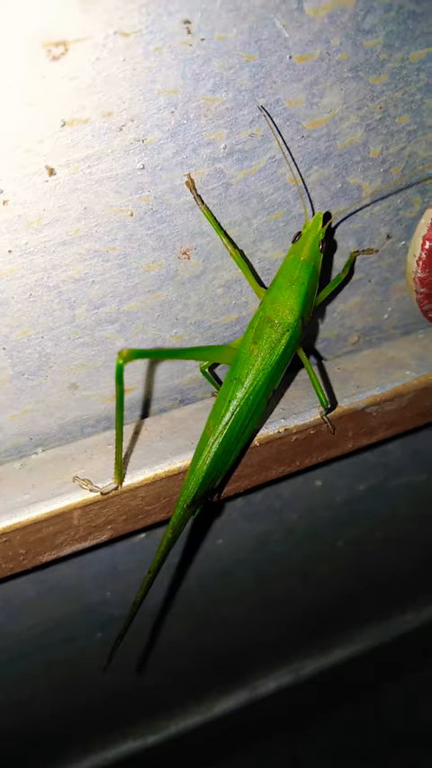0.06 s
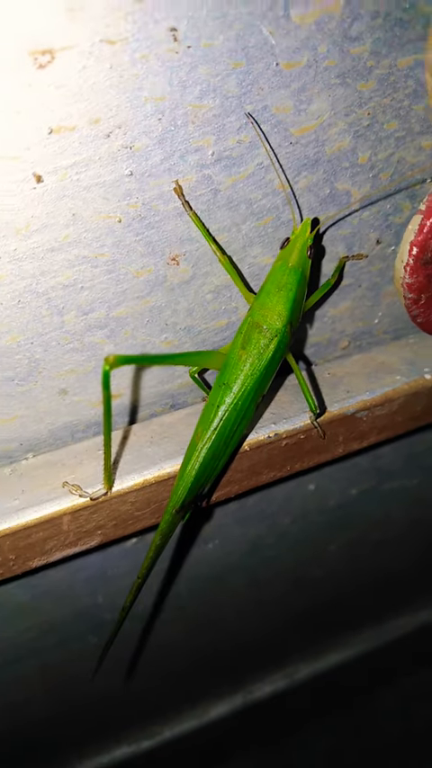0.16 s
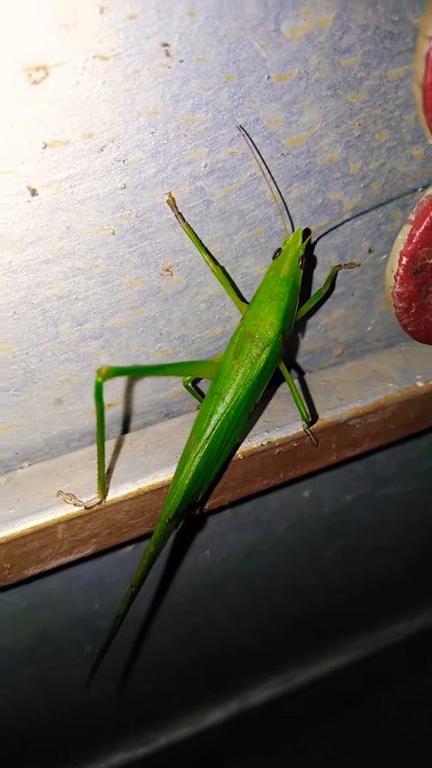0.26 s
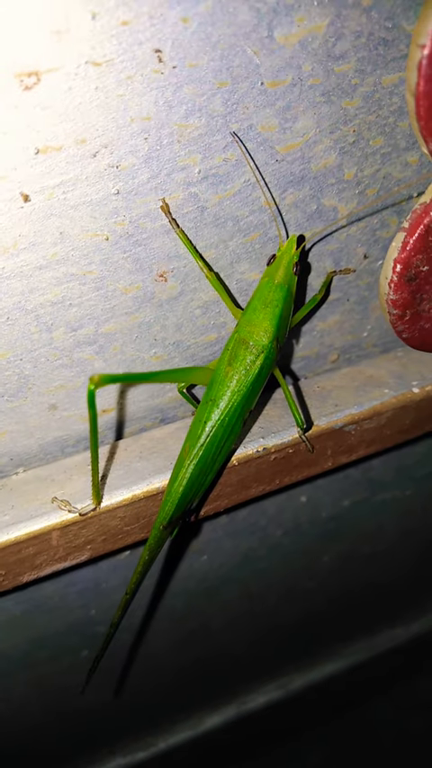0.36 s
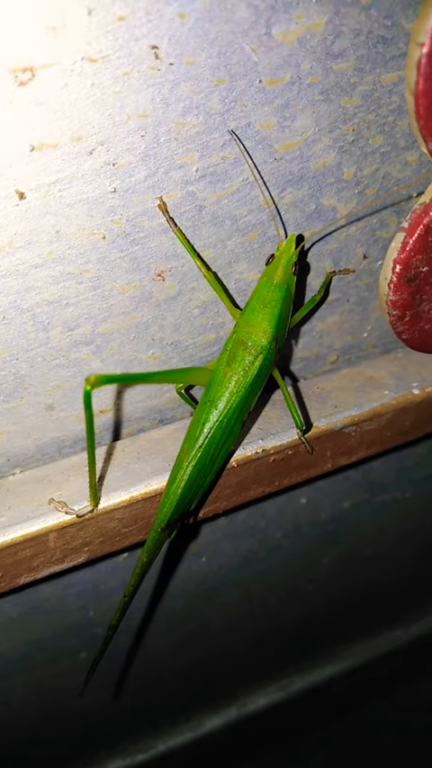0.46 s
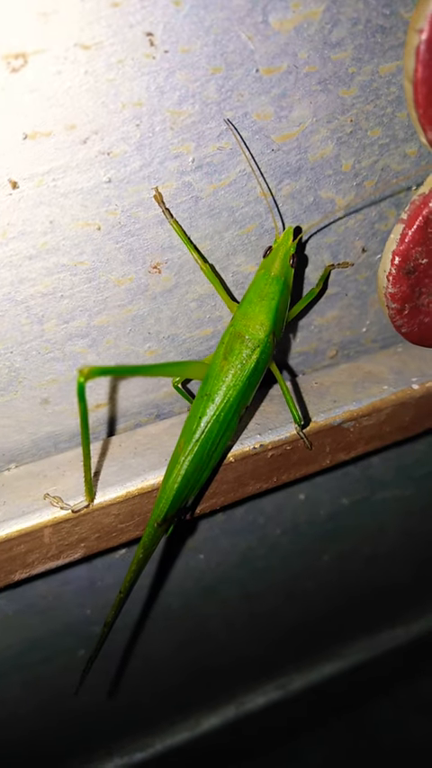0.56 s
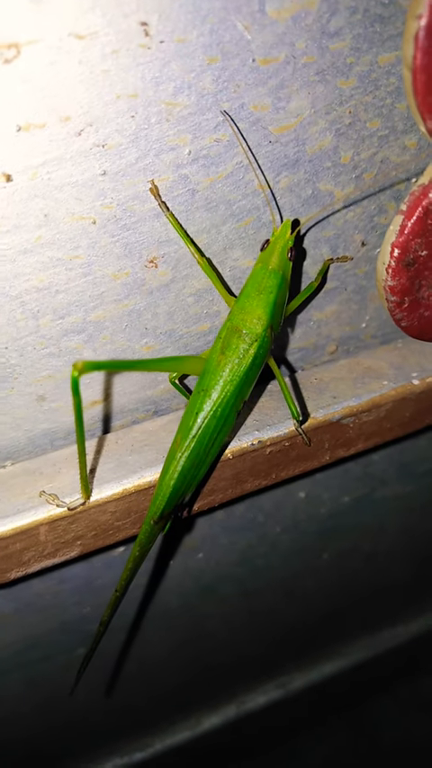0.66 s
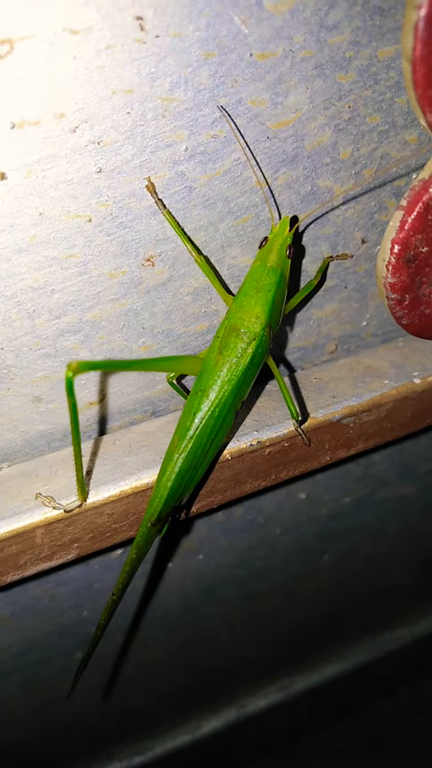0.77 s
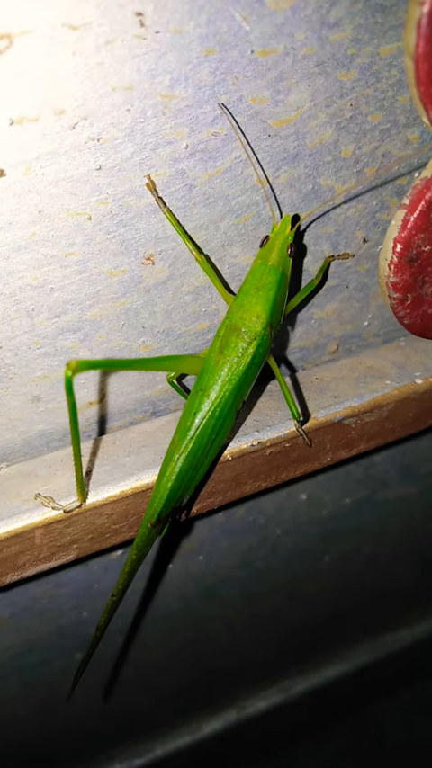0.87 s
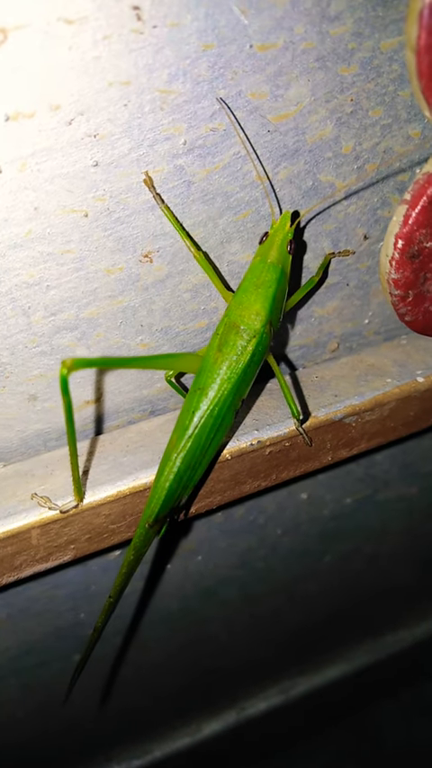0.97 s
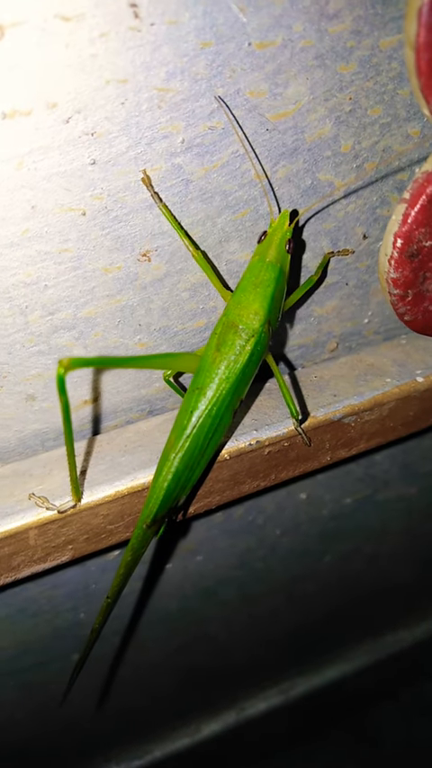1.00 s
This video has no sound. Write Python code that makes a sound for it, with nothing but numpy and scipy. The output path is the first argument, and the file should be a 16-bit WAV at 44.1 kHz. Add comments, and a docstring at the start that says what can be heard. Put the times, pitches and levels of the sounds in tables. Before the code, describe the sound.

A katydid scrapes its wings a few times close by at about 0.2 seconds, then starts a loud, high, rasping buzz at 0.3. The buzz gets harder around 0.7 seconds, lightly knocking the surface beneath, and stops sharply with a last flick near 1.2. A faint click and slight rustle follow around 1.4. A small room's low air murmur and a few soft bumps lie underneath.

```python
"""A small room with a low, steady murmur of air. Close by on the wall, a katydid gives a few trial
scrapes, buzzes for about a second and stops. Each closing wing stroke drags the scraper over a file
of teeth: a rasping tone of about 3 ms; the opening stroke is softer. Hard strokes also knock the
surface under it. Soft low bumps dot the background, and a faint click and a rustle come at the end."""
import sys
import numpy as np
from scipy import signal
from scipy.fft import rfft, irfft
from scipy.io import wavfile
from scipy.ndimage import uniform_filter1d

SR = 44100
rng = np.random.default_rng(int(sys.argv[2]) if len(sys.argv) > 2 else 0)


def master(y):
    """Save y as 16-bit WAV."""
    cut = np.clip(np.atleast_2d(y).T, -1, 1)
    pcm = np.round(cut * 32767)  # scale
    wavfile.write(sys.argv[1], SR, pcm.astype(np.int16))


N = 63945

# colour of the room air: freq_hz, level_db
AIR_COLOUR = [(410, -30.5), (700, -11), (886, 2.5), (1230, -2), (1620, -7), (2430, -6), (2880, -12.5),
              (5840, -17.5), (7590, -29.5), (9110, -23), (16000, -60.5)]
# fader ride on the air: time_s, gain_db
AIR_RIDE = [(0, 5.5), (.22, 4.5), (.32, 0.5), (.6, 1.5), (1.1, -3), (1.22, -1.5), (1.33, -1.5), (1.39, 2.5),
            (1.45, 6)]
# colour of the low rumble: freq_hz, level_db
RUMBLE_COLOUR = [(20, -29), (55, 2.5), (120, -3.5), (200, -3.5), (400, -7), (700, -4.5), (1100, -16),
                 (3000, -57)]
# fader ride on the rumble: time_s, level_db
RUMBLE_RIDE = [(0, -49.5), (.5, -51), (.65, -45), (1.15, -46), (1.22, -56.5), (1.34, -59), (1.45, -45.5)]
# soft low bumps: centre_s, pitch_hz, length_s, level_db
LOW_BUMPS = [(0.053, 92, 0.022, -37), (0.119, 137.3, 0.016, -32.5), (0.217, 85.8, 0.023, -38),
             (0.333, 91.5, 0.014, -43), (1.188, 116, 0.017, -41), (1.43, 61, 0.043, -44.5)]
# single scrapes around the buzz: time_s, level_db, length_ms, pitch_hz, roughness (1 up is all rasp)
SINGLE_SCRAPES = [(0.196, -30.5, 5.5, 3100, 1.17), (0.2103, -19, 7.7, 3930, 0.95),
                  (0.225, -22, 8.4, 2800, 1.1), (.2392, -19, 3.1, 3500, 0.76),
                  (0.2518, -25, 8.4, 4900, 0.95), (0.266, -10.5, 2.2, 4300, 0.6),
                  (0.2681, -27, 5.8, 4480, 0.7), (0.2774, -5.5, 1.4, 4300, 0), (0.293, -7, 1., 6200, 0.7),
                  (0.2953, -29, 4.5, 3100, .7), (1.183, -12, 2, 4150, 0.05)]
# how the wing resonates to the tooth rate and its harmonics: freq_hz, gain_db
WING_RESPONSE = [(3000, -12), (4100, -14), (4650, -8.5), (5200, -11.5), (6500, -10.5), (7700, -23.5),
                 (8400, -.5), (9000, 2.5), (9650, -6), (10100, -17), (10800, -42.5), (12500, -16.5),
                 (13600, -8.5), (14600, -27), (16000, -26)]
# colour of the rasp: freq_hz, level_db
RASP_COLOUR = [(500, -34.5), (2500, -17), (3500, -8), (4500, -16), (5500, -5), (7000, -2.5), (8700, 8.5),
               (10500, -1.5), (12000, -6.5), (14000, 1.5), (15500, -3), (17000, -29.5)]
# wing beat of the buzz: time_s, rate_hz
WING_BEAT = [(.30, 74.05), (.42, 72.81), (.56, 74.15), (.74, 75.59), (.98, 75.73), (1.11, 71.82),
             (1.16, 66.88)]
# effort through the buzz: time_s, level_db, stroke_ms, force (0-1), opening_gain_db
BUZZ_EFFORT = [(.30, -5.5, 1.81, .05, -49), (.355, -7.5, 1.7, 0.2, -15), (.39, -4.5, 3.03, 0.01, -14),
               (.46, -7, 3.3, 0.1, -10.5), (.57, -5, 3.8, 0.21, -14), (.675, -5, 3.4, 0.31, -15.5),
               (.712, -1.5, 2.57, .95, -13), (.92, -3.5, 3.13, 1, -13.5), (1.08, -4.5, 3.27, 0.93, -10.5),
               (1.16, -4.5, 3.6, 0.74, 0.5)]
# knocks that stand out from the rest: start_s, level_db
ACCENT_KNOCKS = [(0.643, -34), (0.6841, -32), (.7109, -25.5), (0.736, -28), (1.0563, -27), (1.0831, -27)]

BUZZ_START_S, BUZZ_END_S = .306, 1.16
TOOTH_HZ, FORCE_HZ, SLOW_DOWN_HZ = 4400, 480, 130  # tooth rate; rise at full force; sag at the file's end
TOOTH_SLIP, TOOTH_SCATTER = .016, .009  # pitch unevenness within and between strokes
RUN_UP_HZ, HARD_RUN_UP_HZ, RUN_UP_MS = 350, 900, 1.25  # the scraper starts slow and gathers speed
CATCH_ROUGH, CATCH_MS = .6, .7  # it scratches until it grips the teeth
LEAD_SHARE, HARD_LEAD_MS = .48, .98  # how far ahead of the beat a light and a hard stroke begin
EDGE_SHARE, HARD_EDGE_SHARE = .23, .13  # attack and release as shares of the stroke
BITE_DB, BITE_MS = 5.5, .45  # extra push on the first teeth of a hard stroke
TICK_LEAD_MS, TICK_MS, TICK_DB = 3, 1.1, -16  # the scraper catches the file before each stroke
OPEN_LAG_MS, OPEN_MS, OPEN_HZ, OPEN_RUN_UP_HZ, OPEN_ROUGH = 5.04, 3, 4410, 310, .35  # opening stroke


def amp(db):
    """Decibels to gain."""
    return 10 ** (np.asarray(db) / 20)


def curve(table, t):
    """A table's other columns, read at t along the first."""
    rows = np.array(table, float).T
    return [np.interp(t, rows[0], col) for col in rows[1:]]


def noise(colour):
    """Noise of rms 1, shaped by freq_hz, level_db points."""
    hz, db = np.array(colour, float).T
    freqs = np.maximum(np.fft.rfftfreq(N, 1 / SR), 1)
    gain = amp(np.interp(np.log(freqs), np.log(hz), db))
    shaped = irfft(rfft(rng.standard_normal(N)) * gain, N)
    return shaped / shaped.std()


def add(out, at, sound):
    """Mix a sound in at a time, to a fraction of a sample."""
    i, size = int(at * SR), len(sound) + 32
    delay = np.exp(-2j * np.pi * np.fft.rfftfreq(size) * (at * SR - i))
    late = irfft(rfft(sound, size) * delay, size)
    out[i:i + size] += late[:len(out[i:i + size])]


def swell(t, centre_s, length_s):
    """A bell-shaped fade in and out."""
    return np.exp(-(2 * (t - centre_s) / length_s) ** 2)


def room_tone(t, air_db=-45):
    """The bed: murmuring air over a low rumble, each drifting in level."""
    air = amp(air_db + curve(AIR_RIDE, t)[0]) * noise(AIR_COLOUR)
    rumble = amp(curve(RUMBLE_RIDE, t)[0]) * noise(RUMBLE_COLOUR)
    return air + rumble


def bumps(t):
    """Soft bumps, each a few cycles of a low sine."""
    return sum(amp(db) * swell(t, at, length) * np.sin(2 * np.pi * (hz * t + rng.random()))
               for at, hz, length, db in LOW_BUMPS)


def stroke(rasp, length_ms, hz, run_up_hz, rough, edge=EDGE_SHARE, bite_db=0):
    """The scraper crosses the file: a gliding tone at the tooth rate with its harmonics, and rasp."""
    size = 512
    ms = np.arange(size) * 1000 / SR
    slip = uniform_filter1d(rng.standard_normal(size), size=10) * np.sqrt(10)
    rate = hz - run_up_hz * np.exp(-(ms / RUN_UP_MS) ** 2)
    rate -= SLOW_DOWN_HZ * np.minimum(ms / length_ms, 1) ** 4
    rate *= 1 + TOOTH_SCATTER * rng.standard_normal()
    phase = 2 * np.pi * np.cumsum(rate * (1 + TOOTH_SLIP * slip)) / SR
    tone = sum(amp(curve(WING_RESPONSE, k * rate)[0]) * np.sin(k * phase) for k in range(1, 4))
    rough = np.clip(rough + CATCH_ROUGH * np.exp(-(ms / CATCH_MS) ** 2), 0, 1)
    start = rng.integers(N - size)
    grit = np.sqrt(.5) * rasp[start:start + size]
    ramp = np.clip(np.minimum(ms, length_ms - ms) / (edge * length_ms), 0, 1)
    envelope = np.sin(np.pi / 2 * ramp) ** 2
    bite = 1 + (amp(bite_db) - 1) * np.exp(-((ms - HARD_LEAD_MS) / BITE_MS) ** 2)
    return envelope * bite * (np.sqrt(1 - rough ** 2) * tone + rough * grit)


def scrapes(rasp):
    """Lone wing strokes: the trial scrapes before the buzz and one last flick after it."""
    out = np.zeros(N)
    for at, db, length_ms, hz, rough in SINGLE_SCRAPES:
        lead_ms = min(length_ms / 2, HARD_LEAD_MS)
        add(out, at - lead_ms / 1000, amp(db) * stroke(rasp, length_ms, hz, 0, rough, edge=.25))
    return out


def buzz(t, rasp, knock_db=-29):
    """Each wing beat is a tick, a closing and an opening stroke; force adds pitch, bite and knock."""
    out = np.zeros(N)
    beats = np.cumsum(curve(WING_BEAT, t)[0]) / SR
    beats -= np.interp(BUZZ_START_S, t, beats)
    times = np.interp(np.arange(np.interp(BUZZ_END_S, t, beats)), beats, t)
    for at in times:
        db, length_ms, force, open_db = curve(BUZZ_EFFORT, at)
        jitter = rng.standard_normal(6)
        gain = amp(db + .5 * jitter[0])
        lead_ms = (1 - force) * LEAD_SHARE * length_ms + force * HARD_LEAD_MS
        edge = (1 - force) * EDGE_SHARE + force * HARD_EDGE_SHARE
        run_up = (1 - force) * RUN_UP_HZ + force * HARD_RUN_UP_HZ
        rough = .17 + (.75 / length_ms) ** 2  # shorter strokes are raspier
        closing = stroke(rasp, length_ms, TOOTH_HZ + force * FORCE_HZ, run_up, rough, edge,
                         force * BITE_DB)
        start = at + (.04 * jitter[1] - lead_ms) / 1000
        add(out, start, gain * closing)
        add(out, start, force * amp(knock_db + jitter[2]) * knock())
        tick = amp(TICK_DB + 2 * jitter[4]) * stroke(rasp, TICK_MS, TOOTH_HZ, 0, rough=.96)
        add(out, at - (TICK_LEAD_MS + .72 * jitter[3]) / 1000, gain * tick)
        if at < times[-1]:
            opening = stroke(rasp, OPEN_MS, OPEN_HZ, OPEN_RUN_UP_HZ, 1 - force * (1 - OPEN_ROUGH))
            add(out, at + (OPEN_LAG_MS - OPEN_MS / 2) / 1000, gain * amp(open_db + jitter[5]) * opening)
    return out


def knock(start_hz=2287, fall_ms=.34, decay_ms=8.1):
    """A bending wave in the surface: the highs arrive first, so the knock falls in pitch."""
    ms = np.arange(1024) * 1000 / SR
    phase = 2 * np.pi * np.cumsum(start_hz / (1 + ms / fall_ms)) / SR
    return np.sin(phase) * np.exp(-(ms / decay_ms) ** 2)


def wing_rub(t, rasp):
    """The wings rub between strokes: a thin hiss that fades in under the buzz."""
    fade = np.interp(t, [BUZZ_START_S, .65, 1.14, BUZZ_END_S], [0, 1, 1, 0])
    return amp(-28) * fade * np.sqrt(.5) * rasp


def click(t, pitch_hz=2250):
    """One faint, pitched click after the katydid stops."""
    return amp(-37) * swell(t, centre_s=1.356, length_s=.005) * np.sin(2 * np.pi * pitch_hz * t)


def rustle(t):
    """A slight, bright rustle at the very end."""
    return amp(-57) * swell(t, centre_s=1.425, length_s=.04) * noise(RASP_COLOUR)


def room_reverb(x, t60_s=.06, wet_db=-22):
    """Adds a short diffuse tail from the nearby walls."""
    t = np.arange(SR // 3) / SR
    tail = rng.standard_normal(len(t)) * np.exp(-np.log(1000) * t / t60_s) * (t > .002)
    return x + amp(wet_db) * signal.fftconvolve(x, tail / np.linalg.norm(tail))[:N]


def scene():
    """The katydid up front with a touch of room, over the quiet bed, in mono."""
    t = np.arange(N) / SR
    rasp = noise(RASP_COLOUR)
    katydid = buzz(t, rasp) + scrapes(rasp) + wing_rub(t, rasp)
    for at, db in ACCENT_KNOCKS:
        add(katydid, at, amp(db) * knock())
    background = room_tone(t) + rustle(t) + bumps(t) + click(t)
    return (room_reverb(katydid) + background)[None]


def record(dry):
    """Soft saturation rounds the loudest peaks, and a steep low-pass cuts the top."""
    ceiling, top_hz = .93, 16000
    lowpass = signal.ellip(8, .1, 50, top_hz, fs=SR, output="sos")
    return signal.sosfiltfilt(lowpass, ceiling * np.tanh(dry / ceiling))


dry = scene()
out = record(dry)
master(out)
```